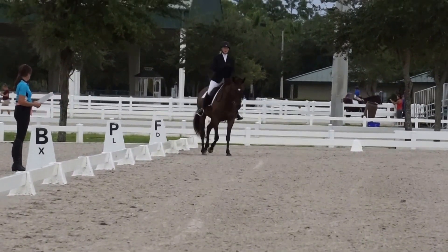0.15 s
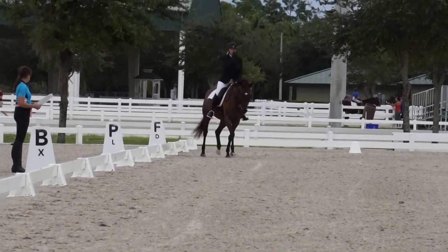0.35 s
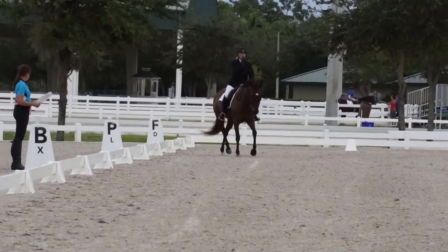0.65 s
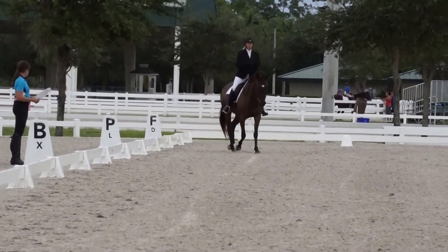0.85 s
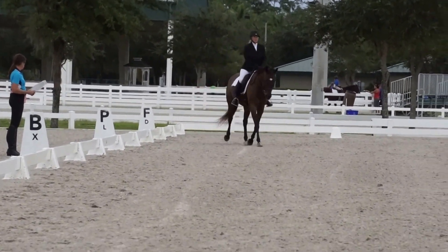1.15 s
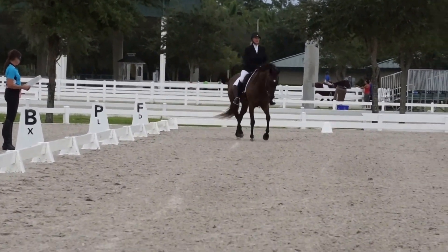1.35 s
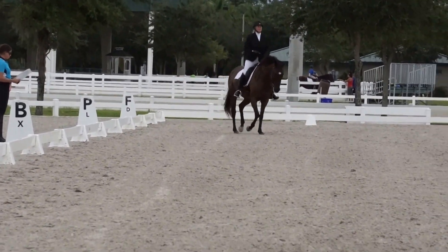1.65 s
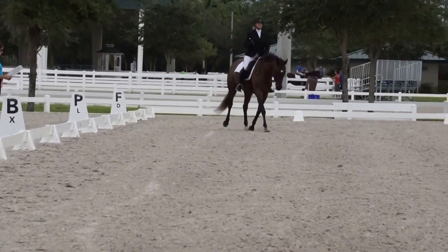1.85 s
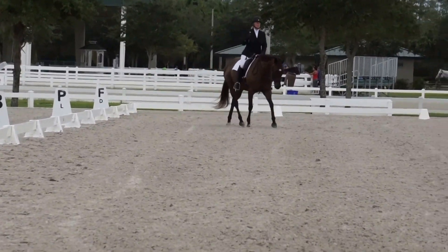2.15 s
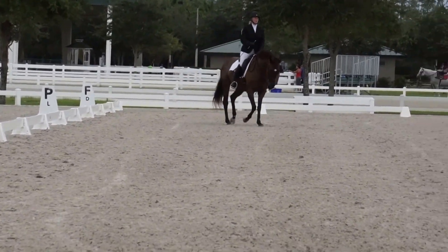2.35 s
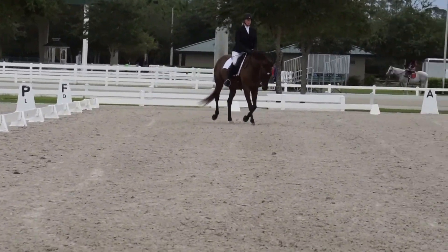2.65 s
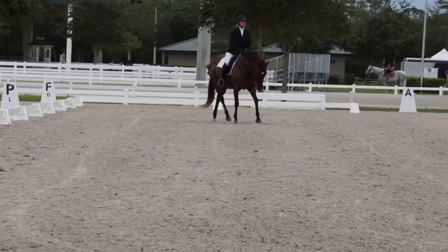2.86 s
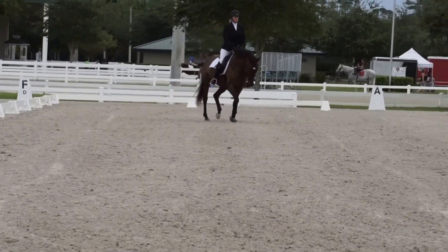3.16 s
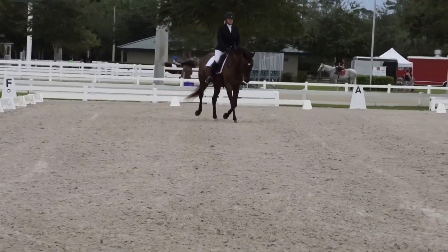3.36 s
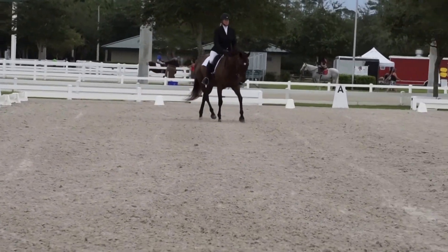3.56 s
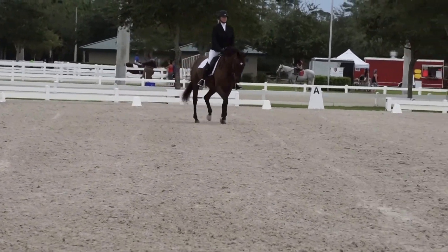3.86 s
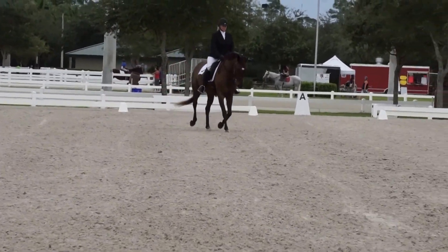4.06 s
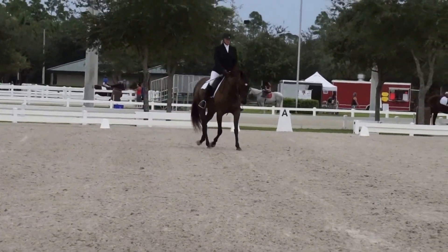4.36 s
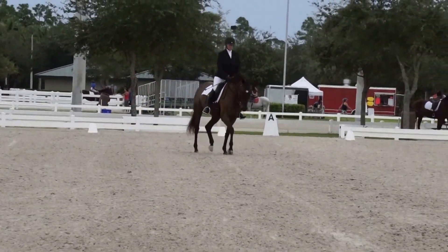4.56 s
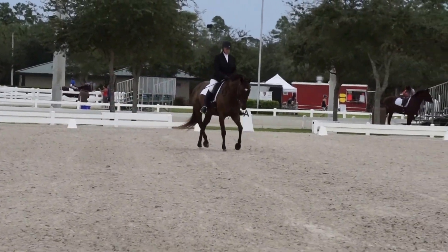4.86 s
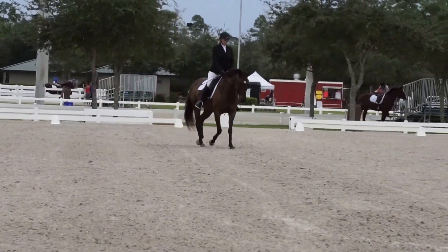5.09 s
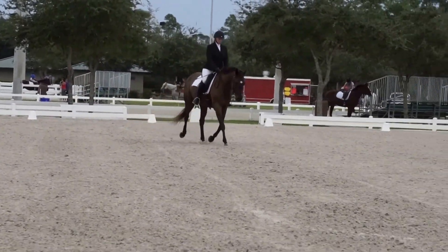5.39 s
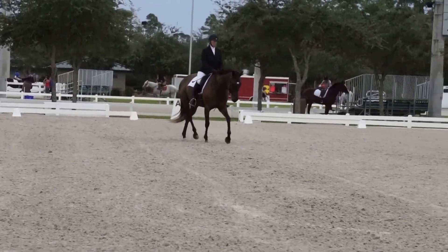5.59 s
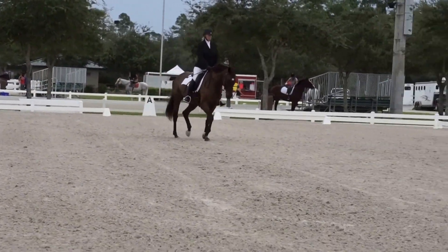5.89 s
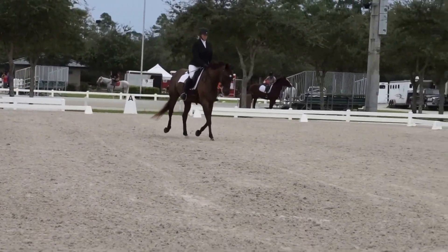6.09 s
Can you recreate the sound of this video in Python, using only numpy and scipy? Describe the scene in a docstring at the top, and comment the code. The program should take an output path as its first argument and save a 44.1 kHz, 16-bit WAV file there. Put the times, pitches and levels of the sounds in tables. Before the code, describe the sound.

Birdsong and faint chatter outdoors, far engines humming, ticks and knocks at the microphone, then a horse's whinny starts and is cut off.

```python
"""A showground among trees. From the start two distant engines hum as wavering harmonics, one slowing
and fading, over open-air rumble made of noise in bands. Ticks and later knocks of camera handling are
noise bursts. A small songbird warbles close by on the right in gliding, nearly pure tones; farther birds
chatter and another answers on the left. After four seconds the other engine speeds up, the near bird
breaks into trembling warbles, and at the end a horse starts a shrill whinny whose harmonics turn rough."""
import sys
import numpy as np
from scipy import signal
from scipy.fft import rfft, irfft, next_fast_len
from scipy.io import wavfile
from scipy.ndimage import uniform_filter1d, map_coordinates

SR = 44100
rng = np.random.default_rng(int(sys.argv[2]) if len(sys.argv) > 2 else 0)


def put_to_file(sound):
    """Save the sound as 16-bit audio at rate SR, in the file named by the first command-line argument."""
    columns = np.atleast_2d(sound).T  # one column per channel
    safe = np.clip(columns, -1, 1)
    whole_steps = np.round(safe * 32767)
    wavfile.write(sys.argv[1], SR, whole_steps.astype(np.int16))


N = 274743
T = np.arange(N) / SR


def from_db(db):
    """Decibels to gain."""
    return 10 ** (np.asarray(db) / 20)


def rms_one(x):
    """Scale to unit rms."""
    return x / np.sqrt(np.mean(x ** 2) + 1e-20)


def in_time(rows):
    """Columns of a curve at every sample."""
    s, *columns = np.transpose(rows)
    return [np.interp(T, s, column) for column in columns]


def at_hz(points, hz):
    """Read a spectrum on a log-frequency axis."""
    f, value = np.transpose(points)
    return np.interp(np.log(np.maximum(hz, 1)), np.log(f), value)


def colour(x, spectrum):
    """Give a signal a spectrum."""
    length = x.shape[-1]
    size = next_fast_len(length)
    gain = from_db(at_hz(spectrum, np.fft.rfftfreq(size, 1 / SR)))
    return irfft(rfft(x, size) * gain, size)[..., :length]


def drift(rate):
    """Smooth chance of spread 1 that changes about rate times a second."""
    return rms_one(map_coordinates(rng.standard_normal(8192), [T * rate], order=3, mode="wrap"))


def sides(pan_db):
    """Left and right gains; a positive pan leans left."""
    return from_db([[pan_db / 2], [-pan_db / 2]])


def place(x, pan_db, lag_s=0):
    """Two channels at constant power; the left one may hear the sound later."""
    left = map_coordinates(x, [np.arange(len(x)) - lag_s * SR], order=3)
    return rms_one(sides(pan_db)) * np.array([left, x])


def add(out, s, x):
    """Mix a short sound in at time s."""
    at = max(round(s * SR), 0)
    out[..., at:at + x.shape[-1]] += x[..., :max(N - at, 0)]


def dying(t, t60):
    """A level that falls 60 dB in t60."""
    return from_db(-60 * t / t60)


def burst(spectrum, t60, attack_s=0.00073):
    """A puff of coloured noise that swells quickly and dies, a little different in each channel."""
    t = T[:SR // 4]
    noise = rms_one(colour(rng.standard_normal((2, len(t))), spectrum))
    return noise * dying(t, t60) * (1 - np.exp(-t / attack_s))


# returns from tree line and stands: delay_s, level_db
ECHOES = [(0.022, -22), (.047, -54), (.118, -30), (0.192, -30)]


def outdoors(x, scatter_db, t60, onset_s=0.0023):
    """A few echoes from trees and stands, and the scatter of foliage."""
    t = T[:SR]
    scatter = rng.standard_normal((2, SR)) * dying(t, t60) * (1 - np.exp(-t / onset_s))
    response = from_db(scatter_db) * rms_one(scatter) / np.sqrt(SR)
    for delay, db in ECHOES:
        echo = rms_one(rng.standard_normal((2, 64))) / np.sqrt(64)
        add(response, delay, from_db(db) * echo)
    return signal.fftconvolve(x[None], response, axes=1)[:, :N]


def engine(hz, db, orders, waver_db, unsteady):
    """Low firing harmonics that waver on their way across the grounds."""
    phase = 2 * np.pi * np.cumsum(hz * (1 + unsteady * drift(12))) / SR
    hum = np.zeros(N)
    for multiple, order_db in orders:
        gain = from_db(db + order_db + waver_db * drift(9))
        hum += gain * np.sin(round(multiple) * phase + 2 * np.pi * rng.random())
    return np.sqrt(2) * hum


# engine that slows and fades: time_s, firing_rate_hz, level_db
ENGINE_SLOWING = [(0, 60.53, -45.5), (1.2, 57.27, -46.5), (1.7, 54.25, -48), (2.3, 53.2, -46.5),
                  (3.0, 52.03, -57.5), (6.23, 52.1, -88)]
# its harmonics: multiple of the firing rate, level_db re the engine
SLOWING_ORDERS = [(1, -5), (2, -4), (3, -2.5), (4, -4), (5, -7), (6, -12.5), (7, -18)]


def slowing_engine():
    """A far engine whose firing rate and level sink together."""
    hz, db = in_time(ENGINE_SLOWING)
    return engine(hz, db, SLOWING_ORDERS, waver_db=3.0, unsteady=0.0058)


IDLE_HZ, SPEED_UP_S, SPEED_UP_HZ_PER_S = 130.54, 4.0, 5.5
# engine that idles, then speeds up: time_s, level_db
RISING_LEVEL = [(0, -49.5), (1.9, -46), (3.6, -45), (4.0, -40), (4.4, -42.5), (4.8, -38.5), (5.3, -38),
                (5.7, -45), (6.23, -47)]
# its harmonics: multiple of the firing rate, level_db re the engine
RISING_ORDERS = [(1, 0.5), (2, -18)]


def rising_engine():
    """A far engine holds its idle firing rate, then slowly climbs."""
    hz = IDLE_HZ + SPEED_UP_HZ_PER_S * np.maximum(T - SPEED_UP_S, 0)
    return engine(hz, in_time(RISING_LEVEL)[0], RISING_ORDERS, waver_db=2.5, unsteady=0.00779)


BREEZE_DB = -43
# puffs of air on the microphone: centre_s, half_width_s, level_db
PUFFS = [(0, .025, -33.5), (.26, 0.058, -38), (.81, 0.039, -37), (1.0, 0.04, -40), (1.33, 0.09, -36.5),
         (4.2, 0.033, -46), (4.53, 0.074, -39), (4.87, 0.088, -39)]


def puffs():
    """Gain of the air on the microphone: a steady breeze and a few soft swells."""
    power = from_db(BREEZE_DB) ** 2
    for s, width, db in PUFFS:
        swell = np.exp(-.5 * ((T - s) / width) ** 2)
        power = power + (from_db(db) * swell) ** 2
    return np.sqrt(power)


RUMBLE_DB, WASH_DB, LEAVES_DB, HISS_DB = -40, -49, -55.5, -61
# tilt of the air noise inside each band: frequency_hz, density_db per Hz
AIR_SPECTRUM = [(20, -5.5), (45, 5.5), (70, 6.5), (115, 0), (170, -3), (260, -9), (350, -13), (470, -22),
                (760, -16), (1100, -21.5), (1600, -28), (3000, -33.5), (5500, -42), (15500, -48)]
# how alike left and right are: frequency_hz, correlation (-1 to 1)
LIKENESS = [(30, 1), (140, 1), (300, 0.91), (600, 0.54), (1200, 0.36), (2500, 0.053), (6000, -0.32),
            (15000, 0.12)]


def open_air():
    """Air on the microphone, far traffic and faint hiss: alike in both channels in the bass, diffuse above."""
    size = next_fast_len(N)
    hz = np.fft.rfftfreq(size, 1 / SR)
    alike = np.clip(at_hz(LIKENESS, hz), -.99, .99)
    mid, side = rfft(rng.standard_normal((2, size)))
    air = np.sqrt(1 + alike) * mid + np.sqrt(1 - alike) * side * [[1], [-1]]
    air = air * from_db(at_hz(AIR_SPECTRUM, hz))
    edges_hz = [12, 90, 450, 1500, 5000, SR / 2]
    gains = [puffs(), from_db(RUMBLE_DB), from_db(WASH_DB), from_db(LEAVES_DB), from_db(HISS_DB)]
    out = np.zeros((2, N))
    for low, high, gain in zip(edges_hz, edges_hz[1:], gains):
        band = irfft(air * (hz >= low) * (hz < high), size)[:, :N]
        out += gain * rms_one(band)
    return out


REBOUND_S, REBOUND_DB, REBOUND_T60_S = .004, -9.5, 0.018   # each tick chatters once more
# sharp ticks at the camera: start_s, level_db before the tick trim, t60_s
TICKS = [(0.029, -30, 0.008), (0.0462, -21.5, 0.007), (0.369, -48.5, 0.036), (4.455, -39, .01),
         (4.484, -39.5, 0.036), (4.4964, -32, 0.01), (4.5035, -24.5, 0.008)]
# colour of a tick: frequency_hz, density_db per Hz
TICK_SPECTRUM = [(300, -35), (1500, -1), (3500, -6), (5500, -4), (7200, 1.5), (9500, 1.5), (13000, 0.5),
                 (16000, -6)]
# dull knocks and scuffs: start_s, level_db before the knock trim, t60_s, body_thud_db
KNOCKS = [(3.538, -43, .03, -64), (3.631, -42.5, 0.022, -57), (3.664, -47, 0.21, -68),
          (4.144, -37, 0.042, -42), (4.166, -38, 0.13, -29.5), (4.204, -51, 0.24, -39.5),
          (4.418, -39, 0.021, -60)]
# colour of a knock: frequency_hz, density_db per Hz
KNOCK_SPECTRUM = [(200, -4), (700, -3), (1600, -3), (2600, 7.5), (4000, -4), (6000, -9), (10000, -16.5),
                  (16000, -18)]
# resonances of the camera body: frequency_hz, level_db re the thud, t60_s
BODY = [(79, 3, 0.38), (226, -7, 0.37), (389, -7, 0.14)]


def handling(tick_trim_db=-2.0, knock_trim_db=-1.5, tick_pan_db=6.5, knock_pan_db=-7.5):
    """Bright ticks of plastic, and duller knocks that also thud through the camera body."""
    out, t = np.zeros((2, N)), T[:SR // 2]
    for s, db, t60 in TICKS:
        gains = from_db(db + tick_trim_db) * sides(tick_pan_db)
        add(out, s, gains * burst(TICK_SPECTRUM, t60))
        add(out, s + REBOUND_S, from_db(REBOUND_DB) * gains * burst(TICK_SPECTRUM, REBOUND_T60_S))
    for s, db, t60, thud_db in KNOCKS:
        gains = from_db(db + knock_trim_db) * sides(knock_pan_db)
        add(out, s, gains * burst(KNOCK_SPECTRUM, t60))
        for hz, mode_db, ring_s in BODY:
            add(out, s, from_db(thud_db + mode_db) * np.sin(2 * np.pi * hz * t) * dying(t, ring_s))
    return out


# faint bird overtones by where they land: frequency_hz, level_db re the note before the overtone trim
OVERTONES = [(4000, -27), (7000, -36), (10000, -44), (12000, -26), (13300, -36), (14400, -23), (15600, -25)]


def notes(shape, rows, tremble, edge_s=0.0035, flutter_db=1.4, rounding=0.13, overtone_trim_db=-3.0):
    """Each note is one nearly pure tone that glides through its shape between its lowest and highest pitch."""
    out = np.zeros(N)
    wobble, flutter = 1 + tremble * drift(260), flutter_db * drift(170)
    share, height, shape_db = np.transpose(shape)
    for start, length, low, high, db, *swell_db in rows:
        t = T[:max(round(length * SR), 64)]
        u = t / t[-1]
        span = np.minimum(round(start * SR) + np.arange(len(t)), N - 1)
        # round the corners of the glide
        smoothing = max(int(rounding * len(t)), 1)
        glide = uniform_filter1d(np.interp(u, share, height), smoothing, mode="nearest")
        hz = (low + (high - low) * glide) * wobble[span]
        phase = 2 * np.pi * np.cumsum(hz) / SR
        gate = np.sin(np.pi / 2 * np.clip(np.minimum(t, t[-1] - t) / edge_s, 0, 1)) ** 2
        tone = np.sin(phase)
        for k in range(2, 7):
            tone = tone + from_db(overtone_trim_db + at_hz(OVERTONES, k * hz)) * np.sin(k * phase)
        level_db = db + np.interp(u, share, shape_db) + sum(swell_db) * (u - .5) + flutter[span]
        add(out, start, from_db(level_db) * gate * tone)
    return out


SONG_TREMBLE = 0.0072   # share of the pitch
# Shapes: share of the note (0-1), height (0 lowest pitch, 1 highest), level_db re the note.
# Notes: start_s, length_s, lowest_hz, highest_hz, level_db before the bird's trim.
# Pitches are before the tremble.
# high notes that climb and drop
ARCH = [(0, 0.4, -13), (.35, .76, -6.5), (.64, .97, -1.5), (.82, 0.48, 1.5), (1, 0, -13)]
ARCHES = [(0.048, .076, 2756, 3313, -34), (.405, 0.08, 2590, 3510, -33), (.762, .086, 2480, 3300, -30)]
# notes that jump up and slide down, mostly in pairs
HOOK = [(0, 0.29, -5.5), (.24, 0.99, 0.5), (.46, 0.58, -2), (.72, .1, -6.5), (1, 0.047, -13)]
HOOKS = [(3.315, 0.021, 2350, 2980, -38), (3.868, 0.029, 2710, 3046, -38.5), (3.896, 0.05, 2250, 2726, -37),
         (4.017, 0.043, 2550, 2740, -39.5), (4.061, .056, 1970, 2710, -33), (4.546, 0.044, 1986, 3254, -31),
         (4.622, 0.046, 2839, 3140, -35), (4.669, 0.044, 2115, 3090, -31.5), (4.789, .048, 2470, 3053, -32)]
# rising notes
UPSLUR = [(0, 0, -5.5), (.5, .48, 0), (1, 1, -6)]
UPSLURS = [(0.117, .027, 2590, 2820, -41.5), (.171, 0.047, 2130, 2525, -38),
           (0.246, 0.0118, 2500, 3260, -39), (.527, 0.033, 2114, 2410, -40.5),
           (0.896, 0.041, 2074, 2460, -41.5), (1.277, 0.035, 2100, 2350, -40),
           (1.322, 0.048, 2484, 2740, -34), (1.593, 0.043, 2112, 2340, -38.5),
           (1.944, 0.041, 2037, 2190, -37), (1.994, 0.043, 2200, 2500, -34.5),
           (4.514, 0.03, 2750, 3120, -34.5), (6.209, .012, 2620, 3100, -40)]
# notes that dip and lift again
SCOOP = [(0, 1, 2.5), (.25, .35, -1), (.62, 0, -0.5), (.85, 0.27, -3), (1, 0.54, -4)]
SCOOPS = [(.216, 0.042, 2400, 2806, -39), (0.572, 0.051, 2407, 2666, -37.5),
          (.942, 0.054, 2370, 2980, -35.5), (1.637, 0.048, 2340, 2910, -35.5),
          (5.193, 0.026, 2920, 3220, -46.5), (5.219, 0.024, 2000, 2270, -39.5),
          (6.145, 0.023, 1920, 2300, -39), (6.191, 0.037, 1970, 2070, -40.5)]
# falling notes, quick and high or slow and low
DOWNSLUR = [(0, 1, -12), (.25, 0.7, -0.5), (.55, .22, -1.5), (1, 0, -8.5)]
DOWNSLURS = [(0.249, 0.027, 2180, 3590, -34), (0.608, 0.035, 1860, 2596, -42.5),
             (1.385, 0.03, 2660, 3700, -37), (1.437, 0.05, 1870, 2330, -39.5),
             (1.713, 0.025, 2510, 3640, -31), (1.761, 0.056, 1810, 2180, -41),
             (2.067, 0.029, 2344, 3314, -32), (2.112, 0.059, 1805, 2030, -41.5),
             (3.928, .044, 2193, 2258, -36), (4.136, 0.047, 2560, 2710, -39), (4.712, .05, 2130, 2220, -48)]
# two long low whistles, with a sixth column: swell_db over the note
WHISTLE = [(0, .65, -3), (.18, .33, -1.5), (.42, 0.01, -3.5), (.56, .15, -4.5), (.73, .65, 0),
           (.86, 0.91, -7.5), (1, 0.99, -7)]
WHISTLES = [(2.988, .222, 2080, 2380, -41, 7), (3.332, .21, 2037, 2340, -37, -7)]


def near_bird(trim_db=0.5, song_pan_db=-14.5, warble_pan_db=-8.5, lag_s=.0001, warble_wet_db=2.0):
    """A songbird on the right strings a few kinds of gliding note into phrases, with late warbles."""
    kinds = [(ARCH, ARCHES), (HOOK, HOOKS), (UPSLUR, UPSLURS),
             (SCOOP, SCOOPS), (DOWNSLUR, DOWNSLURS), (WHISTLE, WHISTLES)]
    song = sum(notes(shape, rows, SONG_TREMBLE) for shape, rows in kinds)
    warble = warbles()
    direct = place(song, song_pan_db, lag_s) + place(warble, warble_pan_db, lag_s)
    scattered = outdoors(song + from_db(warble_wet_db) * warble, scatter_db=-10, t60=1.0)
    return from_db(trim_db) * (direct + scattered)


CHATTER_PER_S, CHATTER_DB = 11, -52.5   # level before the far birds' trim
CHATTER_LOW_HZ, CHATTER_HIGH_HZ = 1844, 2780   # range of each slur's lowest pitch
CHATTER_SWEEP = 0.182   # share of the pitch


def chatter():
    """Faint short slurs of many birds farther off, at random moments and pitches."""
    draws = rng.random((int(CHATTER_PER_S * N / SR), 4))
    rows = []
    for when, length, pitch, strength in draws:
        low = CHATTER_LOW_HZ + (CHATTER_HIGH_HZ - CHATTER_LOW_HZ) * pitch
        db = CHATTER_DB + 6 * (strength - .5)
        rows.append((when * T[-1], 0.0148 + 0.0307 * length, low, low * (1 + CHATTER_SWEEP), db))
    return notes(DOWNSLUR, rows[::2], tremble=0.023) + notes(UPSLUR, rows[1::2], tremble=0.016)


# thin twitter from the trees: start_s, length_s, lowest_hz, highest_hz, level_db before the trim
TWITTERS = [(.72, .06, 3600, 3760, -57), (1.485, 0.06, 3390, 3750, -53.5), (1.55, 0.072, 3470, 3550, -60)]
# slurs of the answering bird: start_s, length_s, from_hz, to_hz, level_db before the trim
FAR_SLURS = [(1.11, 0.053, 2600, 1980, -51), (1.972, .026, 3020, 2600, -48.5),
             (2.181, 0.022, 3000, 2430, -49), (2.266, 0.062, 2780, 2380, -55),
             (2.563, 0.044, 2420, 3223, -55), (2.628, .055, 2920, 2500, -52.5),
             (2.682, .1, 2456, 2370, -58), (2.798, .045, 2720, 3130, -53.5),
             (2.85, .085, 3080, 1880, -51.5), (3.493, .032, 3050, 2310, -50),
             (4.348, 0.037, 1870, 2050, -53.5), (4.391, 0.036, 1900, 2050, -52),
             (5.152, .05, 2220, 2010, -51)]


def far_birds(slur_pan_db=5.0, twitter_pan_db=-8.0, trim_db=1.0):
    """An answering bird on the left, a twitter and chatter in the trees; much of it arrives scattered."""
    rising = [row for row in FAR_SLURS if row[2] < row[3]]
    falling = [(s, length, last, first, db) for s, length, first, last, db in FAR_SLURS if first >= last]
    slurs = notes(UPSLUR, rising, tremble=.013, flutter_db=2.5)
    slurs = slurs + notes(DOWNSLUR, falling, tremble=.013, flutter_db=2.5)
    twitter = notes(UPSLUR, TWITTERS, tremble=0.036)
    direct = place(slurs, slur_pan_db) + place(twitter, twitter_pan_db)
    scattered = outdoors(slurs + twitter + chatter(), scatter_db=-1.5, t60=1.0)
    return from_db(trim_db) * (direct + scattered)


WARBLE_TREMBLE = 0.034   # share of the pitch
SWEEP_FROM_HZ, SWEEP_TO_HZ, SWEEP_LEAD_S, SWEEP_S = 2400, 3005, .024, 0.0186
WARBLE_SCOOP_S, WARBLE_DIP_HZ = .028, 645
QUAVER_LOW_HZ, QUAVER_HIGH_HZ, QUAVER_DB = 1914, 2120, -3.5   # level re the scoop
# warbles: scoop_start_s, scoop_lowest_hz, tail_length_s, level_db, upsweep_db (before the bird's trim)
WARBLES = [(5.24, 2140, 0.0079, -41.5, -43), (5.299, 2280, 0.061, -40.5, -43),
           (5.437, 2070, 0.046, -38.5, -47), (5.561, 2190, 0.043, -39.5, -56),
           (5.698, 1920, 0.044, -42, -42.5)]
# shape of the scoop: share of the note (0-1), height (0-1), level_db re the note
WARBLE_SCOOP = [(0, 1, -2), (.2, .3, -1.5), (.5, 0.01, 1), (.8, .15, -7), (1, 0.23, -8)]
# shape of the quavering tail: share of the note (0-1), height (0-1), level_db re the note
QUAVER = [(0, 0.78, -5), (.2, 0.31, 1), (.4, 0.91, -4), (.62, 0.08, -2), (.85, .9, 0), (1, 0.66, -7)]


def warbles(overtone_trim_db=2.5):
    """The near bird's trembling phrase: sweep up, scoop down, quaver."""
    sweeps, scoops, tails = [], [], []
    for s, low, tail_s, db, sweep_db in WARBLES:
        sweeps.append((s - SWEEP_LEAD_S, SWEEP_S, SWEEP_FROM_HZ, SWEEP_TO_HZ, sweep_db))
        scoops.append((s, WARBLE_SCOOP_S, low, low + WARBLE_DIP_HZ, db))
        tails.append((s + WARBLE_SCOOP_S, tail_s, QUAVER_LOW_HZ, QUAVER_HIGH_HZ, db + QUAVER_DB))
    parts = [(UPSLUR, sweeps), (WARBLE_SCOOP, scoops), (QUAVER, tails)]
    return sum(notes(shape, rows, WARBLE_TREMBLE, flutter_db=3.0, overtone_trim_db=overtone_trim_db)
               for shape, rows in parts)


# the voice breaks: the clear tone gives way to rough sidebands (levels re effort)
BREAK_S, BREAK_TAKES_S = 6.097, 0.011
SMOOTH_ROUGH_DB, BROKEN_ROUGH_DB, BROKEN_CLEAR_DB = -31, -5.5, -9
# whinny: time_s, whistle_pitch_hz before jitter, effort_db
WHINNY = [(5.91, 1170, -64), (5.965, 1135, -44), (5.995, 996, -44.5), (6.025, 1005, -43), (6.05, 1053, -38),
          (6.095, 1021, -39), (6.15, 1053, -40), (6.23, 1035, -42.5)]
# throat and nose of the horse: frequency_hz, level_db
THROAT = [(700, -28), (1050, -31), (1500, -24), (1760, -7.5), (2060, -2.5), (2300, -22), (2800, -14),
          (3100, -17), (3420, -11.5), (3720, -13), (3950, -29), (4150, -28), (5000, -36), (5230, -16),
          (5450, -37)]


def horse(fold_hz=270, fold_jitter=0.08, whistle_jitter=0.0073, breath_db=-4.0, bloom=.35, pan_db=-3.0):
    """A high whistle in the larynx; when the slow folds join in, each harmonic grows rough sidebands."""
    pitch, effort_db = in_time(WHINNY)
    broken = np.clip((T - BREAK_S) / BREAK_TAKES_S, 0, 1)
    clear_db = effort_db + BROKEN_CLEAR_DB * broken
    rough_db = effort_db + SMOOTH_ROUGH_DB * (1 - broken) + BROKEN_ROUGH_DB * broken
    sounding = T > WHINNY[0][0]
    whistle = (pitch * (1 + whistle_jitter * drift(200)))[sounding]
    folds = (fold_hz * (1 + fold_jitter * drift(150)))[sounding]
    held_back_db = clear_db.max() - clear_db[sounding]
    voice = np.zeros(N)
    for k in range(1, 6):
        for side in range(-1, 3):   # side 0 is the clear harmonic
            hz = k * whistle + side * folds
            db = (rough_db + 3 * drift(120) if side else clear_db + drift(100))[sounding]
            db = db - bloom * max(k - 3, 0) * held_back_db   # top harmonics open with effort
            wave = np.sin(2 * np.pi * (np.cumsum(hz) / SR + rng.random()))
            voice[sounding] += np.sqrt(2) * from_db(db + at_hz(THROAT, hz)) * wave
    # turbulent air rings in the same throat
    breath = rms_one(colour(rng.standard_normal(N), THROAT))
    voice += from_db(rough_db + breath_db) * breath
    return place(voice, pan_db) + outdoors(voice, scatter_db=-5.5, t60=.6)


def scene():
    """Birds, horse and handling over the engines and the open air."""
    hum = slowing_engine() + rising_engine()
    return hum + open_air() + handling() + near_bird() + far_birds() + horse()


CUTOFF_HZ = 15850


def record(dry):
    """A steep elliptic low-pass cuts the top."""
    lowpass = signal.ellip(12, .1, 80, CUTOFF_HZ, fs=SR, output="sos")
    return signal.sosfilt(lowpass, dry)


dry = scene()
out = record(dry)
put_to_file(out)
```